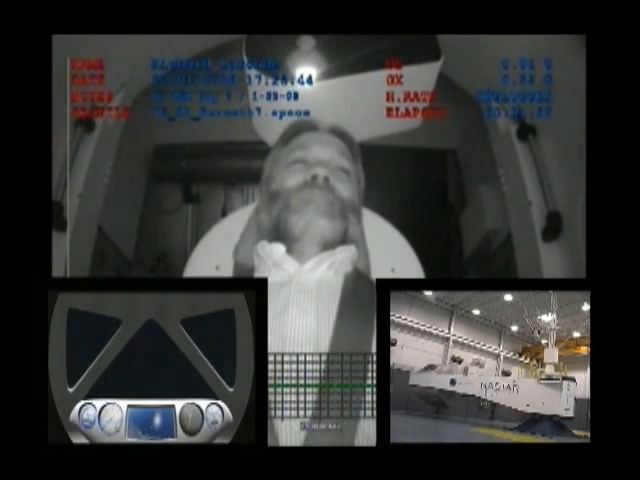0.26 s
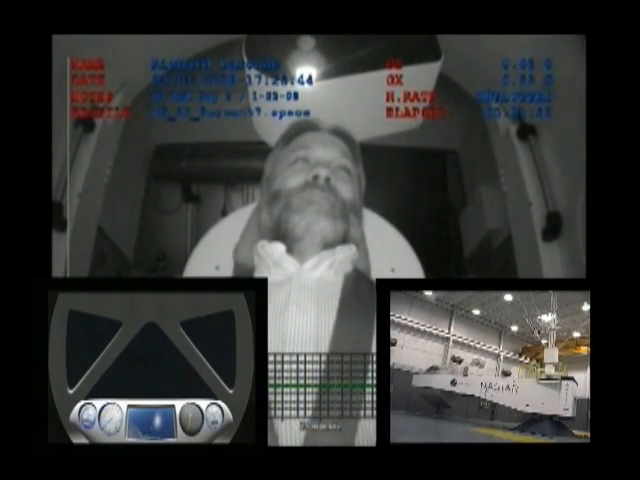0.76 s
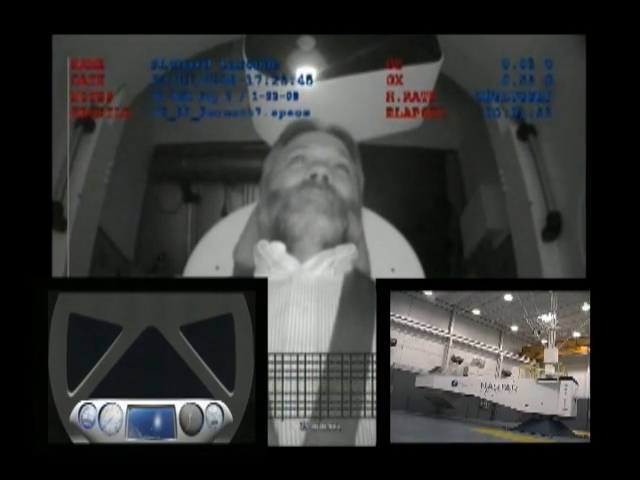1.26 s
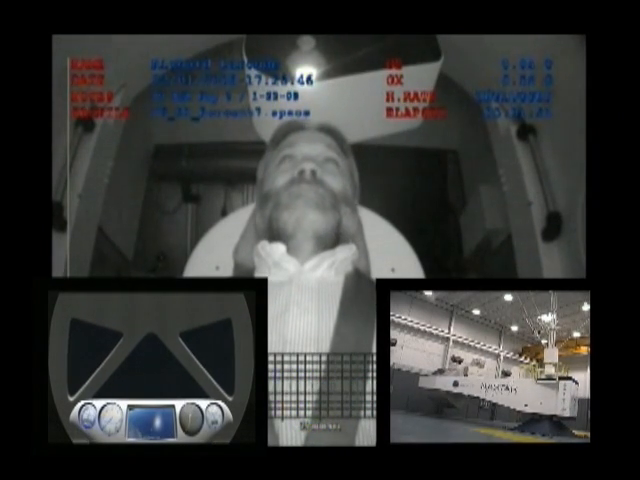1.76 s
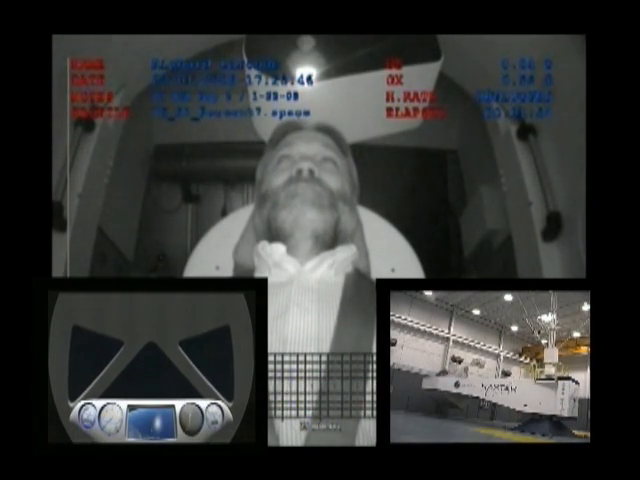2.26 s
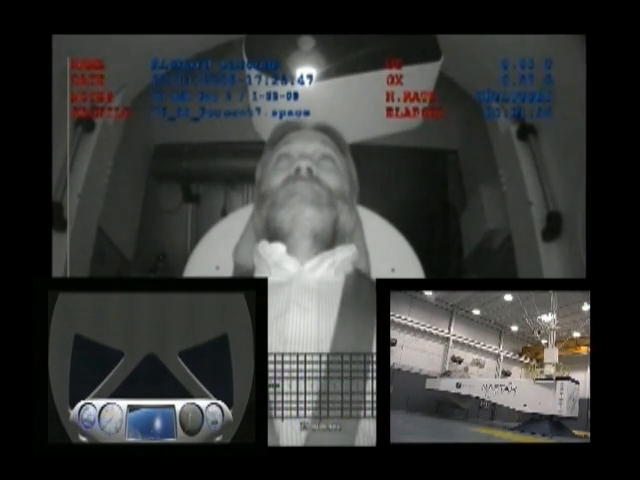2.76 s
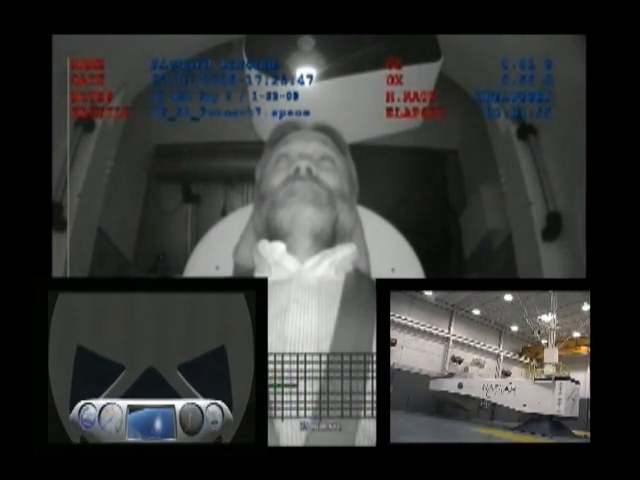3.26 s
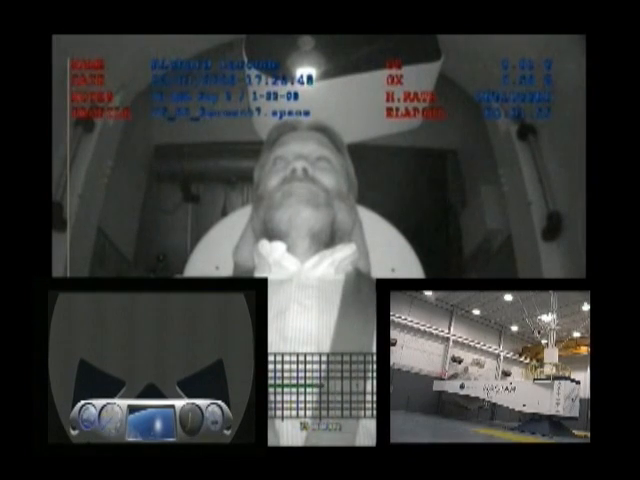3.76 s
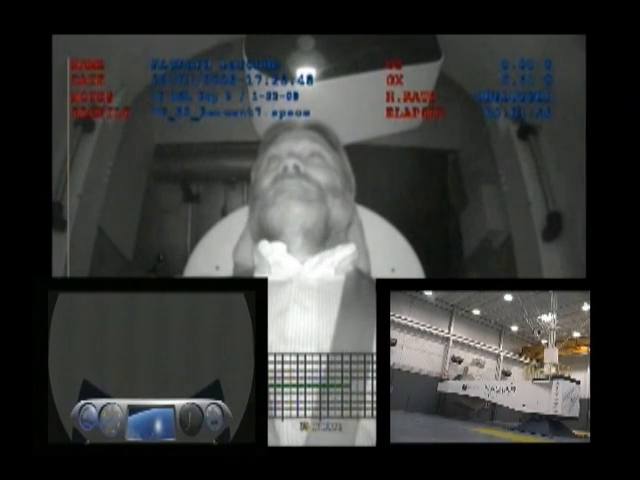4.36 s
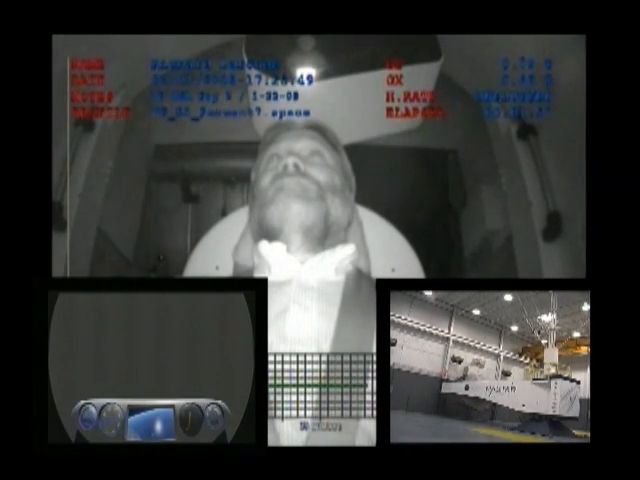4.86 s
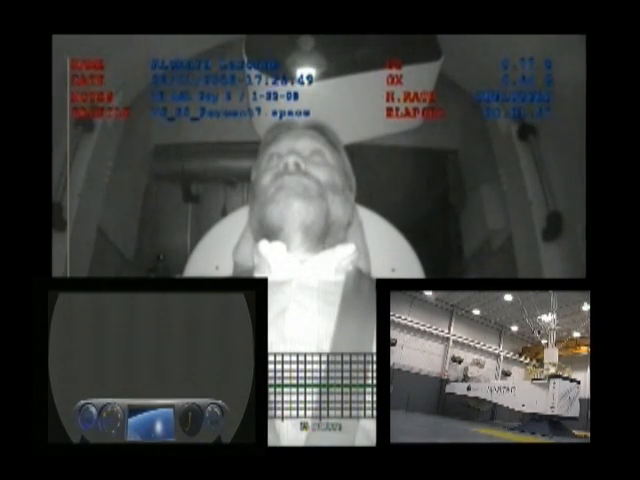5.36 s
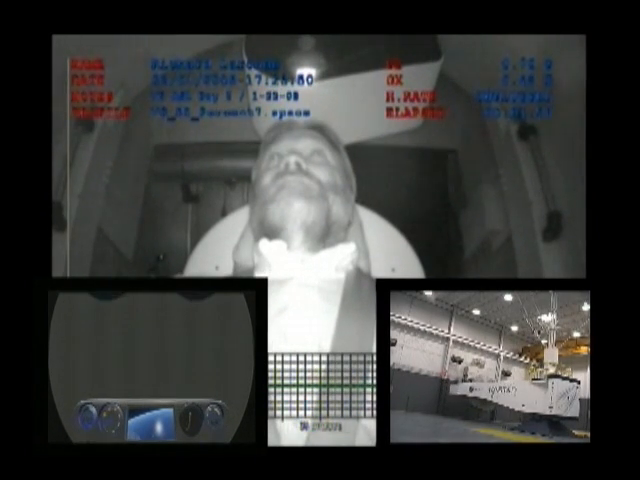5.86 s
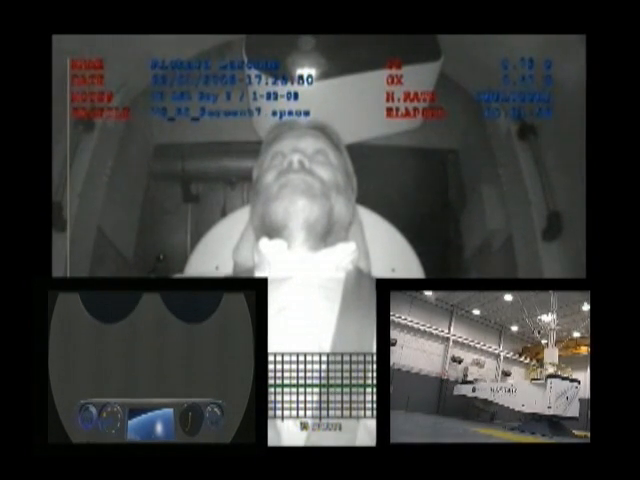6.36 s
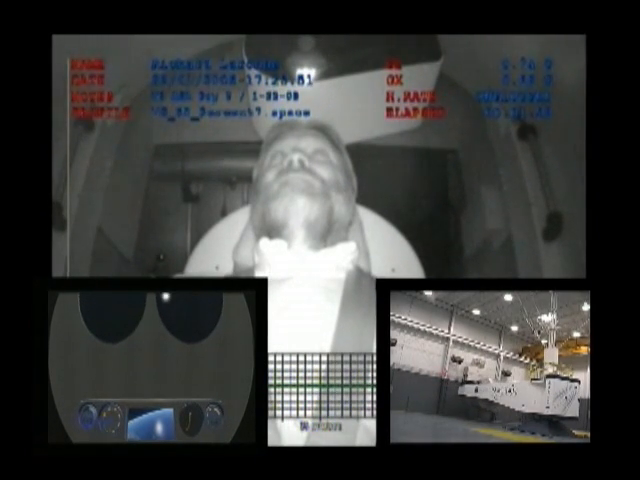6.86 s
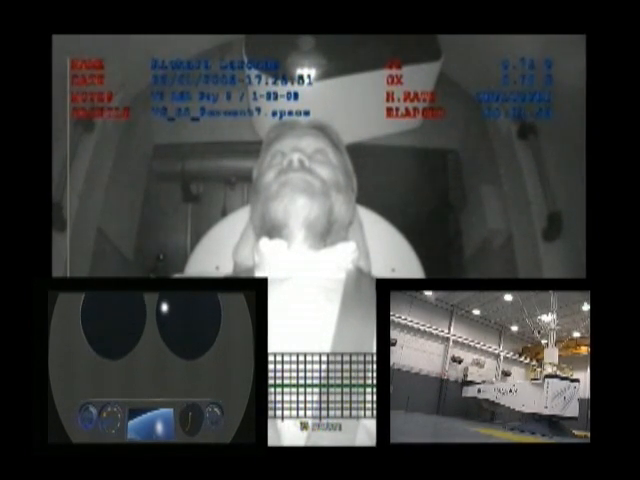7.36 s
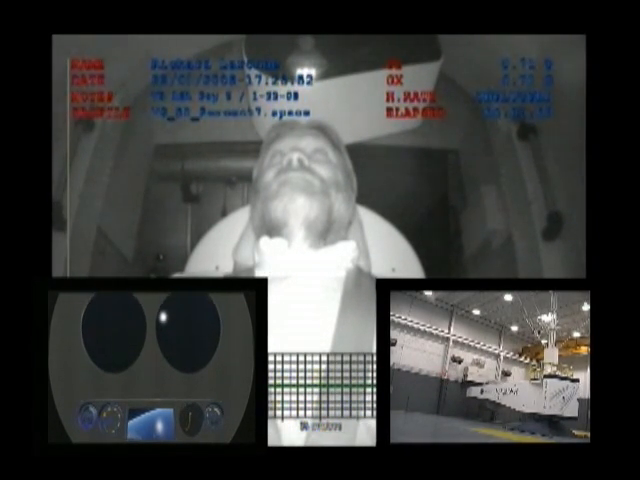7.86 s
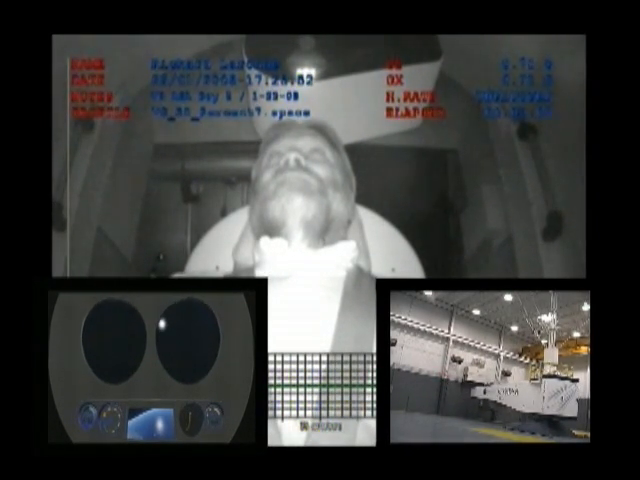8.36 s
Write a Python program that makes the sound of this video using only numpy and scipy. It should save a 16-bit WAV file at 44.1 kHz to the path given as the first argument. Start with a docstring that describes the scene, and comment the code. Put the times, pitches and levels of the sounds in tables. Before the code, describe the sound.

Inside the closed cabin of a large spinning centrifuge, a very deep boom throbs irregularly, rising slightly at first, holding, then sinking. Low floor rumble and dull panel hum surround it, with softer fluttering ventilation above. Faint gear whines strengthen towards the middle and slide down later. A short grainy scuff comes before three seconds. The cabin microphone is close and dull, with barely audible electronic hiss.

```python
"""First heard is a deep throbbing boom, rising from about 73 to 78.5 Hz and later sinking: the lowest mode
of a closed centrifuge gondola, a sine that follows the drive's speed. Floor rumble and panel hum are shaped
noise, ventilation is fluttering noise, and gear tones are sines riding on the speed. Weak steady tones,
brief tones and one grainy scuff join in; the sound link adds hiss and faint clock whistles."""
import sys
import numpy as np
from scipy import signal
from scipy.fft import rfft, irfft, next_fast_len
from scipy.io import wavfile
from scipy.ndimage import map_coordinates

SR = 44100
rng = np.random.default_rng(int(sys.argv[2]) if len(sys.argv) > 2 else 0)


def unload_audio(sound):
    """Save the sound as a 16-bit wav file, at the path given as the first command line argument."""
    columns = np.transpose(np.atleast_2d(sound))
    # keep every value between -1 and 1, then stretch to whole-number steps
    steps = np.round(np.clip(columns, -1, 1) * 32767)
    wavfile.write(sys.argv[1], SR, steps.astype(np.int16))


N = 379260
T = np.arange(N) / SR  # time of each sample, s

# Noise of the link's circuit: pitch_hz, relative_db_per_hz
CIRCUIT_SPECTRUM = [(5000, -40), (6000, -2), (6700, -1), (7100, -6), (7900, -2), (8600, -6), (9300, -8),
                    (10100, -6), (10500, 0), (11000, 1), (12000, -6), (15000, -7), (15900, -11),
                    (17000, -120)]
# Whistles at multiples 1, 3, 4, .. 11 of the link's clock: level_db
CLOCK_LEVELS = [-81, -90, -92, -101, -96, -96, -83, -101, -100, -116]
CLOCK_HZ, BAND_LIMIT_HZ, CIRCUIT_DB = SR / 32, 15800, -90.0

# Steady weak tones: pitch_hz, level_db
FAINT_TONES = [(567, -83), (1136, -85.5), (4732, -108), (5751, -103), (5783, -102)]
# Brief tones: centre_s, pitch_hz, half_length_s (to 1/e), level_db
BRIEF_TONES = [(.478, 1380, 0.082, -65), (.66, 1397, .14, -72), (2.688, 2200, .04, -66),
               (6.25, 1950, .16, -70), (8.12, 963, 0.045, -65), (8.42, 2225, .18, -68.5),
               (9.9, 1980, .13, -71)]

# Duct resonances of the ventilation: pitch_hz, width_hz, relative_db
DUCT_MODES = [(510.4, 20, -2.5), (572, 13, -1), (609.7, 36.4, 0.5), (631, 25, -16), (713, 53, -5),
              (841, 60, -7.5), (921, 59, -0.5), (963.4, 32, -1), (1068, 250, -18.5), (1336, 215, -8.5),
              (1491, 286, -7.5), (1965, 125, -4), (2074, 110, -6.5), (2224, 110, -5)]
# Broad ventilation hiss: pitch_hz, relative_db_per_hz
HISS_SPECTRUM = [(400, -5), (1000, -2.5), (1600, -5), (1750, -12), (1850, -0.5), (2300, 5), (2900, 2.5),
                 (3400, -0.5), (3900, -9.5), (4600, -11), (5100, -15.5), (5900, -17.5), (6200, -33),
                 (7000, -34), (9000, -120)]
AIR_DB, DUCT_SHARE_DB, HISS_SHARE_DB = -58, -4.5, -7  # common gain, then each part's gain

# Colour of the scuff: pitch_hz, relative_db_per_hz
SCUFF_SPECTRUM = [(200, -120), (300, -10), (800, -2), (1500, -3), (1750, -12), (2200, 0), (3500, -3),
                  (4500, -12), (5800, -24), (7000, -45), (9000, -120)]
SCUFF_START_S, SCUFF_RISE_S, SCUFF_T60_S = 2.656, .012, .34
SCUFF_DB = -49  # before the rise and fade

# Drive speed: time_s, offset_percent (from full speed)
DRIVE_SPEED = [(0, -3.5), (.5, -1.2), (1.1, 0), (5.9, 0), (6.5, -1.2), (7.2, -2), (8.6, -3)]
# Gear tones: pitch_hz (at full speed), on_s, loudest_s, off_s, top_level_db
GEAR_TONES = [(875, 2, 4.7, 6.5, -66), (940, .8, 3.8, 6.4, -68.5), (1039, .3, 6, 6.9, -80),
              (2084, 1.2, 4.8, 7.2, -72), (2117, .8, 1.6, 5.6, -72.5), (3135, 1, 4, 8.6, -81)]
GEAR_FADE_S, GEAR_IDLE_DB = .3, -12  # ramp at on and off; change of level outside them
GEAR_SLOPE_DB = 1.7  # loss per second away from the loudest moment

# Panel resonances: pitch_hz, width_hz, relative_db
PANEL_MODES = [(110.3, 32.4, 0), (154.7, 18, -15), (178.3, 12.2, -6.5), (195.4, 22, -9), (216.3, 15, -15),
               (238.6, 13.6, -10), (260, 23, -11.5), (321.3, 62, -18.5), (373.2, 39, -14), (420.8, 37, -17),
               (461, 54, -20)]
PANEL_DB = -51.5
# Level of the floor rumble: time_s, level_db
RUMBLE_LEVEL = [(0, -50), (1.7, -50.5), (2.1, -48.5), (2.6, -53.5), (3.8, -49.5), (4.2, -47.5),
                (4.7, -49.5), (7.4, -51), (8.6, -47.5)]
# Colour of the floor rumble: pitch_hz, relative_db_per_hz
RUMBLE_SPECTRUM = [(12, -28), (21, -27), (26, -15), (40, -6), (54, 2), (64, 2), (76, -3), (90, -2),
                   (102, -12), (112, -20), (140, -40), (200, -120)]

# Level of the boom before throb and drop-outs: time_s, level_db
BOOM_LEVEL = [(0, -41), (.25, -46.5), (.43, -37.5), (.8, -46.5), (1.3, -39), (1.9, -46), (2.3, -40),
              (2.5, -42), (2.8, -37.5), (3, -46.5), (3.45, -38), (3.6, -41), (4.5, -40.5), (5.2, -42),
              (6.1, -42.5), (6.75, -38.5), (7.4, -44), (7.95, -38.5), (8.6, -56)]
# Drop-outs of the boom: centre_s, depth_db
BOOM_DIPS = [(.6, 24), (1.55, 24), (2.9, 29), (2.99, 16), (3.16, 9), (3.64, 27), (3.74, 10), (3.93, 26),
             (4.07, 3), (4.58, 0), (4.64, 4), (4.79, 12), (4.88, 34), (5.05, 11), (5.65, 8), (5.75, 9),
             (5.99, 39), (6.49, 33), (6.82, 11), (7.07, 20), (7.69, 8), (7.91, 20), (8.05, 0), (8.17, 11),
             (8.31, 17)]
BOOM_HZ, BOOM_FOLLOWS = 78.5, 2.1  # pitch at full speed; % of pitch per % of speed
DIP_HALF_S, THROB_DB = 0.021, 3.5  # half-length of a drop-out (to 1/e); depth of the random throb


def amp(db):
    """Decibels express a ratio of amplitudes on a logarithmic scale."""
    return 10 ** (np.asarray(db) / 20)


def unit(x):
    """Normalisation to an rms of 1 lets a single gain set the level."""
    return x / np.sqrt(np.mean(x ** 2) + 1e-20)


def curve(rows):
    """Linear interpolation turns (time_s, value) rows into one value per sample."""
    time_s, value = np.transpose(rows)
    return np.interp(T, time_s, value)


def wobble(rate):
    """Spline interpolation of random knots, rate per second, gives a smooth fluctuation."""
    coarse = T[::24]
    knots = rng.standard_normal(int(N * rate / SR) + 4)
    return np.interp(T, coarse, map_coordinates(knots, [coarse * rate]))


def filtered(x, response):
    """Linear filtering: the spectrum of x is multiplied by a response of frequency."""
    m = next_fast_len(N + 8192)
    return irfft(rfft(x, m) * response(np.fft.rfftfreq(m, 1 / SR)), m)[:N]


def coloured(points):
    """Spectral shaping: noise of rms 1 follows (pitch_hz, db) points on a log axis."""
    f, db = np.transpose(points)

    def response(hz):
        return amp(np.interp(np.log(hz + 1), np.log(f + 1), db, left=-120))

    return unit(filtered(rng.standard_normal(N), response))


def resonant(modes):
    """Modal superposition: noise of rms 1 in resonances, each swelling slowly on its own."""
    total = 0
    for centre_hz, width_hz, db in modes:
        swell = amp(db + 0.61 * wobble(1.514))
        noise = rng.standard_normal(N)
        total = total + swell * filtered(noise, lambda hz: 1 / (1 + (2 * (hz - centre_hz) / width_hz) ** 2))
    return unit(total)


def tone(hz, db, jitter=0):
    """Phase is the integral of frequency: a sine of rms level db follows hz, with jitter in radians."""
    cycles = np.cumsum(hz + 0 * T) / SR + rng.random()
    return np.sqrt(2) * amp(db) * np.sin(2 * np.pi * cycles + jitter)


def relative_speed():
    """Proportionality to shaft speed: the drive's speed as a fraction of full speed."""
    return 1 + curve(DRIVE_SPEED) / 100


def circuit_hiss():
    """Circuit noise: a steady random signal with the link's own spectrum."""
    return amp(CIRCUIT_DB) * coloured(CIRCUIT_SPECTRUM)


def clock_whistles():
    """Harmonic series: steady sines stand at whole multiples of the clock frequency."""
    orders = np.delete(np.arange(1, 12), 1)  # no second multiple
    return sum(tone(k * CLOCK_HZ, db) for k, db in zip(orders, CLOCK_LEVELS))


def faint_tones():
    """Slow modulation: weak sustained sines waver slightly in pitch and level."""
    return sum(tone(hz + 1.5 * wobble(6), db + 2.5 * wobble(3)) for hz, db in FAINT_TONES)


def brief_tones():
    """Gaussian envelopes: short sines swell and die away symmetrically, wavering in pitch."""
    total = 0
    for centre_s, hz, half_length_s, db in BRIEF_TONES:
        envelope = np.exp(-((T - centre_s) / half_length_s) ** 2)
        total = total + tone(hz + 4 * wobble(19), db) * envelope
    return total


def ventilation():
    """Common modulation: duct resonances and broad hiss share one random flutter."""
    flutter = amp(AIR_DB + 0.15 * wobble(13) + 0.7 * wobble(70))
    duct = amp(DUCT_SHARE_DB) * resonant(DUCT_MODES)
    hiss = amp(HISS_SHARE_DB) * coloured(HISS_SPECTRUM)
    return flutter * (duct + hiss)


def scuff():
    """Friction noise: one grainy rub rises quickly and decays exponentially."""
    t = np.maximum(T - SCUFF_START_S, 0)
    rise = (1 - np.exp(-t / SCUFF_RISE_S)) ** 2
    fade = amp(SCUFF_DB - 60 * t / SCUFF_T60_S)
    grain = amp(2.6 * wobble(300))
    return rise * fade * unit(grain * coloured(SCUFF_SPECTRUM))


def gear_tones():
    """Gear pitch is proportional to speed: each tone rides on the drive and peaks at its own moment."""
    speed = relative_speed()
    total = 0
    for hz, on_s, loudest_s, off_s, top_db in GEAR_TONES:
        idle = np.clip(np.maximum(on_s - T, T - off_s) / GEAR_FADE_S + .5, 0, 1)
        level_db = top_db - GEAR_SLOPE_DB * abs(T - loudest_s) + GEAR_IDLE_DB * idle + 2.1 * wobble(14)
        total = total + tone(hz * speed + wobble(10), level_db, jitter=.55 * wobble(22))
    return total


def panel_hum():
    """Forced vibration: panels shaken by the drive hum at their resonances."""
    return amp(PANEL_DB + 0.55 * wobble(5)) * resonant(PANEL_MODES)


def floor_rumble():
    """Structure-borne sound: the drive shakes the floor as low noise of varying level."""
    return amp(curve(RUMBLE_LEVEL)) * coloured(RUMBLE_SPECTRUM)


def cabin_boom():
    """Cavity mode: one low sine follows the drive's speed, throbs and briefly drops out."""
    hz = BOOM_HZ * (1 + BOOM_FOLLOWS * (relative_speed() - 1))
    throb_db = THROB_DB * np.minimum(wobble(24), 1.2)  # swells level off, sags do not
    dips_db = sum(depth_db * np.exp(-((T - s) / DIP_HALF_S) ** 2) for s, depth_db in BOOM_DIPS)
    level_db = curve(BOOM_LEVEL) + throb_db - dips_db
    return tone(hz + 1.31 * wobble(9), level_db, jitter=0.74 * wobble(18))


def scene():
    """Superposition: the pressures of all sources in the gondola add."""
    background = faint_tones() + brief_tones() + ventilation() + scuff()
    drive = gear_tones() + panel_hum() + floor_rumble() + cabin_boom()
    return (background + drive)[None]


def record(dry):
    """Band limitation: the link adds hiss and whistles, then cuts steeply above its limit."""
    lowpass = signal.ellip(10, .1, 40, BAND_LIMIT_HZ, fs=SR, output="sos")
    return signal.sosfiltfilt(lowpass, dry + circuit_hiss() + clock_whistles())


dry = scene()
out = record(dry)
unload_audio(out)
```